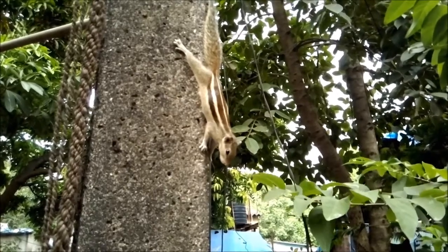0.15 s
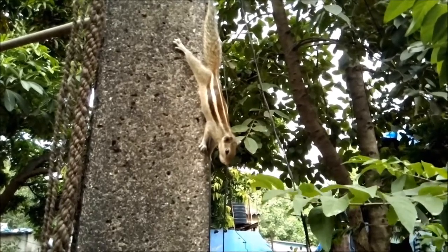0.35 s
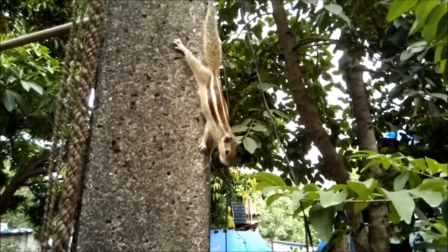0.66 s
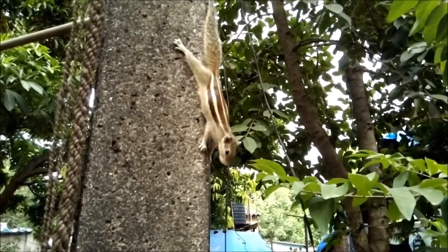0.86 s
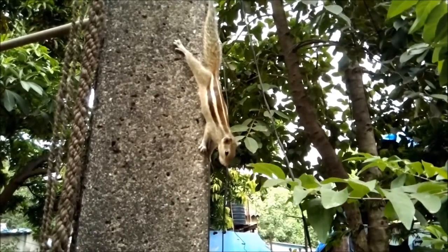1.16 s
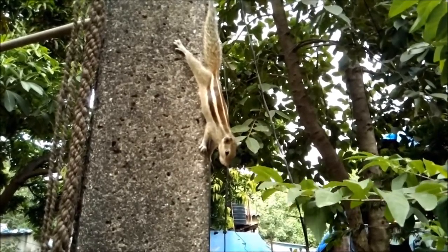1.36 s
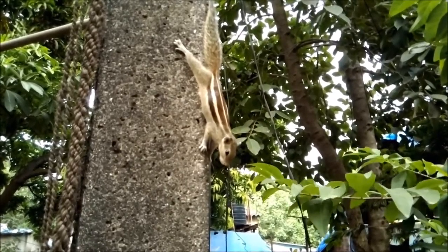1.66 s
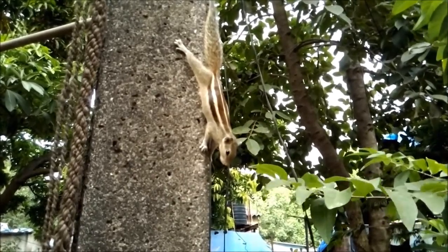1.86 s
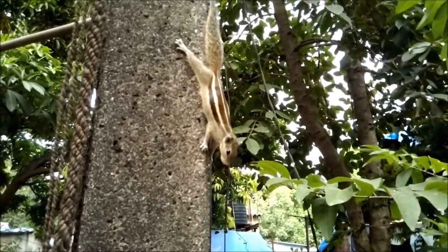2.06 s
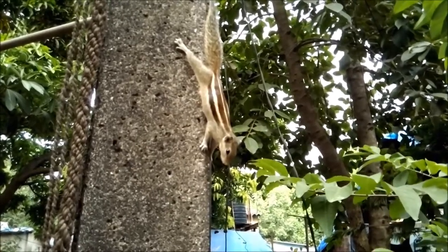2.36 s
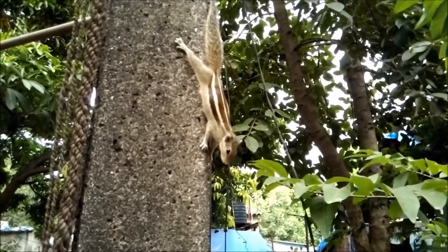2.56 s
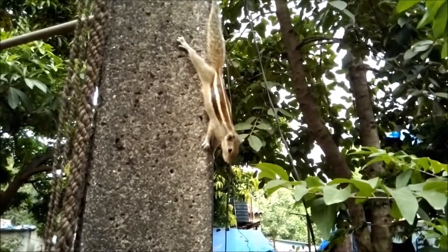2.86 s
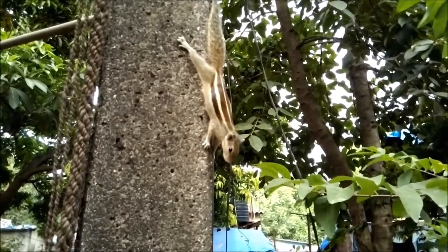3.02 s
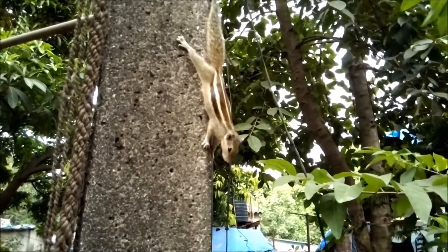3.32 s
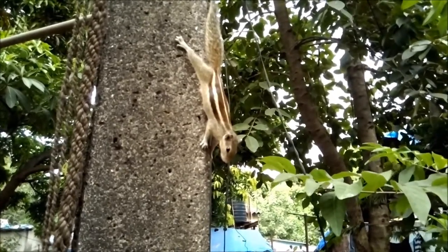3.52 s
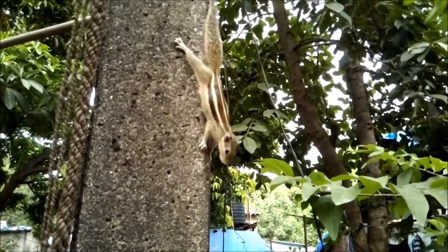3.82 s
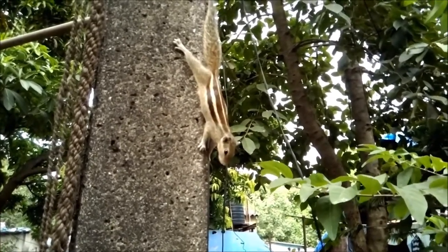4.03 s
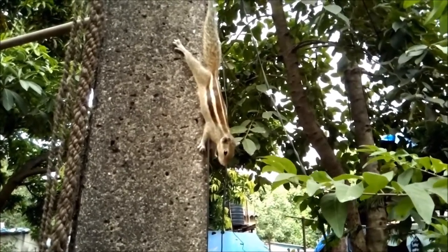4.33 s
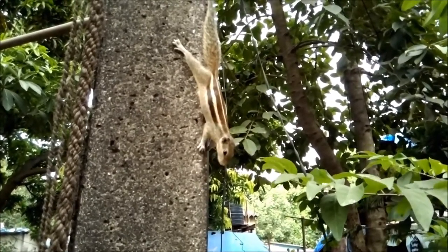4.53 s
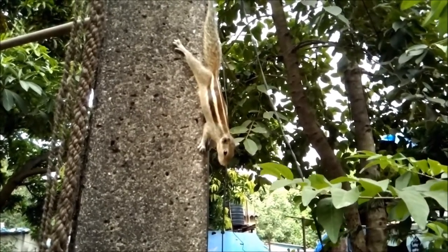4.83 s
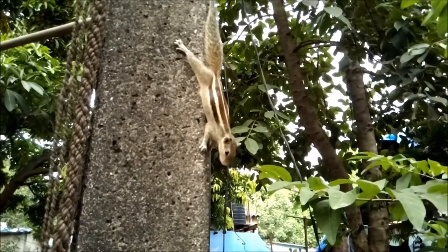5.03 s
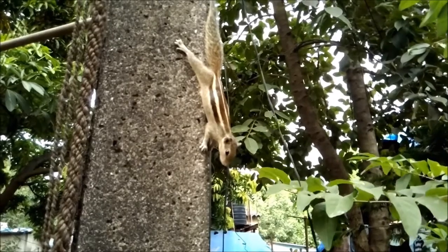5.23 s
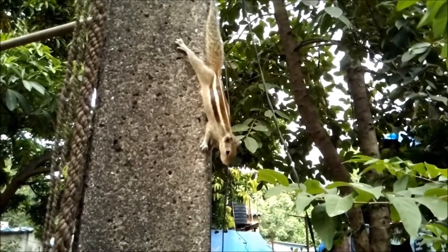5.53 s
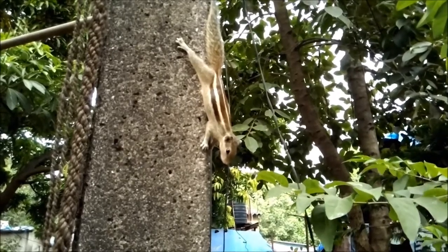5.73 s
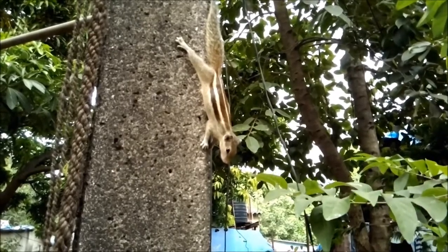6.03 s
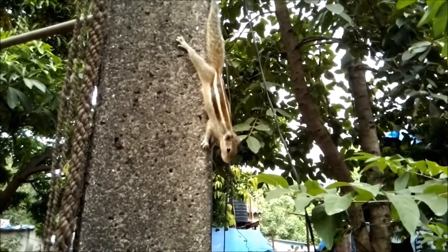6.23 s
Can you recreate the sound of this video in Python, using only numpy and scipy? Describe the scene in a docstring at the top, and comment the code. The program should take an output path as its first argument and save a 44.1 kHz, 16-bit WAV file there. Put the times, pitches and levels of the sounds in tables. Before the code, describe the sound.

Piercing, slightly hoarse two-toned squirrel chirps come in irregular bursts, each under a tenth of a second and sweeping upward. After a quieter gap with faint peeps and a distant bird-like whistle, a rapid run of short downward notes rattles out, then isolated chirps to the end. The calls splash into a bright ringing echo among trunks. Soft outdoor hiss continues throughout, with a few faint dry ticks, heard through a single microphone.

```python
"""Squirrel calling among trunks

A squirrel clings to a trunk and calls: rising chirps and one falling trill, each note two gliding sines. Single
swept sines lie between and over the calls, some faint and far; a few, set together, form further chirps and a
trill note; band noise breathes under the chirps. Trunks and walls scatter every call into a ringing tail, made
by convolution with decaying noise. Below lie a few twig ticks, an outdoor hiss of shaped noise and a faint high
tone of narrow-band noise. One microphone hears it all."""
import sys
import numpy as np
from scipy import signal
from scipy.fft import rfft, irfft, next_fast_len
from scipy.io import wavfile

SR = 44100
rng = np.random.default_rng(int(sys.argv[2]) if len(sys.argv) > 2 else 0)


def waveform_to_disk(signal):
    """Save audio, clipped to [-1, 1], as 16-bit WAV at the path in sys.argv[1]."""
    frames = np.transpose(np.atleast_2d(signal))
    scaled = np.clip(frames, -1, 1) * 32767
    samples = np.round(scaled).astype(np.int16)
    wavfile.write(sys.argv[1], SR, samples)


N = 281358   # samples

# In the call tables, level is set before the swell, waver and glide losses;
# echo send is relative to the direct sound, ahead of the gain of the scattering.
# Rising two-tone chirps: start t/s, length t/s, start f/Hz, top f/Hz, bend, level/dB,
# upper tone above the lower f/Hz, echo send level/dB
CHIRPS = [ (0.343, 0.0806, 6397, 9050, 3.11, -36.5, 1193, -12),
          (0.535, 0.0473, 5933, 7956, 2.42, -30.5, 2312, -7.5),
          (0.597, 0.0754, 6886, 9486, 1.62, -31, 1578, -14),
          (0.834, 0.04, 5900, 7852, 3, -22.5, 2229, -12.5),
          (0.977, 0.048, 6846, 8320, 1.633, -23, 1966, -10),
          (1.075, 0.088, 7803, 9300, 1.135, -30, 2000, -13.5),
          (1.742, 0.0331, 7030, 8054, 1.46, -43, 1302, -19.5),
          (2.124, 0.044, 6366, 8230, 2.35, -34.5, 2088, -11.5),
          (2.151, 0.045, 7895, 8850, 1.86, -42.5, 1960, -6.5),
          (3.43, 0.0415, 6600, 8553, 2.78, -37, 2156, -8.5),
          (3.458, 0.051, 8145, 9173, 1.206, -37.5, 1838, -6),
          (4.249, 0.0567, 7696, 8956, 2.61, -34, 1854, -7),
          (4.461, 0.0566, 5577, 8027, 2.66, -31, 2382, -11.5),
          (5.334, 0.0627, 7090, 9574, 0.936, -38.5, 2047, -8),
          (5.531, 0.0425, 5652, 7978, 2.4, -28, 2436, -8),
          (5.752, 0.0978, 6182, 9165, 1.54, -25, 1616, -16)]
# Falling two-tone notes, first scattered, then a run: start t/s, length t/s, start f/Hz, fall f/Hz,
# level/dB, upper tone above the lower at the start f/Hz, echo send level/dB
TRILL_NOTES = [ (2.977, 0.0157, 3300, 200, -51.5, 1500, -14.5),
               (3.127, 0.0167, 4928, 700, -40.5, 1180, -14.5), (3.235, 0.0168, 4370, 250, -49.5, 1706, -11),
               (3.356, 0.0172, 5590, 800, -50, 1420, -14), (3.565, 0.0124, 7562, 400, -29, 2010, -15),
               (3.608, 0.0201, 5112, 300, -44.5, 1469, -13.5),
               (3.635, 0.0249, 8210, 1100, -21, 1778, -18.5),
               (3.706, 0.0283, 8193, 1138, -20.5, 1768, -17.5),
               (3.773, 0.0327, 8142, 1486, -24.5, 1787, -14), (3.841, 0.0245, 7501, 1294, -27, 1851, -12),
               (3.908, 0.025, 7530, 1183, -24.5, 1843, -10),
               (3.969, 0.0258, 7222, 1117, -26.5, 1846, -14.5),
               (4.032, 0.022, 7143, 1315, -25, 1803, -13.5), (4.087, .026, 6512, 1200, -29, 1265, -11),
               (4.199, 0.0253, 3636, 60, -39, 3593, -10)]
# Single swept tones, faint to loud, some set together as parts of chirps and a trill note: start t/s, length
# t/s, start f/Hz, end f/Hz, bend (+ early, - late), # level/dB, echo send level/dB
WHISTLES = [ (0.0, 0.0105, 8250, 9110, -1.5, -47.5, -12), (0.346, 0.0327, 9200, 10840, 1.45, -50, -9),
            (0.36, 0.0597, 7400, 8316, 5.5, -42.5, -12), (0.867, 0.0115, 7650, 6430, -1.5, -28, -6),
            (1.087, 0.0144, 3710, 6575, 1, -34, -8), (1.223, 0.0498, 5500, 4760, 2, -57.5, -7),
            (1.601, 0.0316, 6025, 7153, 0.62, -33, -16), (1.597, 0.0301, 7170, 8255, 0.3, -38, -13.5),
            (1.605, 0.0197, 8740, 9140, 5.5, -50, -16.5), (1.62, 0.0299, 7980, 9060, 1.35, -41, -17.5),
            (1.636, 0.0267, 7310, 7570, 3, -42, -16), (1.896, 0.0364, 5210, 5730, 5, -51.5, -17),
            (1.899, 0.027, 7120, 7250, 0.5, -48, -15), (2.26, 0.039, 5074, 5677, 4, -43, -13.5),
            (2.604, 0.0312, 10060, 7800, -0.55, -55, -5), (2.669, 0.0126, 5720, 7600, -0.43, -44.5, -11),
            (3.128, 0.0147, 10950, 6930, -0.75, -44, -5), (3.586, 0.013, 5740, 7530, -0.46, -44, -5),
            (3.797, 0.0278, 10130, 9930, -0.82, -30.5, -12), (3.91, 0.0577, 10060, 9921, 9, -27, -22),
            (4.022, 0.0364, 10830, 10420, -1.5, -32.5, -16), (4.137, 0.029, 6750, 6923, 2.06, -24.5, -15.5),
            (4.138, 0.027, 5687, 4670, -1.26, -29.5, -15.5), (4.297, 0.044, 9320, 9650, -0.5, -53, -7),
            (4.881, 0.0293, 8610, 7250, 2, -39, -13), (4.882, 0.0148, 9870, 8100, -0.65, -42.5, -14),
            (5.906, 0.0356, 7560, 8560, 2.5, -38, -14)]
# Short single falling tones, faint to loud: start t/s, start f/Hz, level/dB, echo send level/dB
PIPS = [ (0.0, 7570, -44, -7.5), (0.151, 4677, -62.5, -6), (0.209, 7497, -49, 1), (0.266, 5954, -58, 1.5),
        (0.493, 7573, -56.5, 8.5), (0.802, 7324, -46, -2.5), (1.392, 7384, -50.5, -1),
        (1.518, 6966, -62, 9.5), (1.098, 6682, -36, -14.5), (1.736, 7266, -47.5, -3.5),
        (2.261, 7526, -34.5, -11.5), (2.643, 7593, -48, -7), (2.703, 3544, -52, -15),
        (3.161, 3460, -54.5, -0.5), (3.612, 10370, -45, -12), (3.966, 10750, -40.5, -20.5),
        (4.04, 9190, -24.5, -24), (4.122, 7906, -27, -12), (4.123, 9710, -34.5, -10.5)]
# Path of a far bird's slow whistle: t/s, f/Hz, level/dB before waver
SLOW_WHISTLE = [(2.608, 5042, -61), (2.645, 5538, -58.5), (2.75, 5870, -54), (2.801, 6070, -54),
                (2.84, 6450, -56.5), (2.93, 6550, -66)]
# Decay of the scattered sound over pitch: f/Hz, time to fall by 60 dB t/s
ECHO_DECAY = [(3600, 0.14), (5000, 0.723), (6000, 0.617), (8000, 0.4396), (11000, 0.511)]
# Strength of the scattering over pitch, low notes scatter less: f/Hz, relative level/dB
ECHO_COLOUR = [(3600, -4), (5000, -2), (7000, -1.5), (11000, -2)]
# Twig ticks: t/s, ring level/dB, ring f/Hz
TWIG_TICKS = [(2.133, -37.5, 1234), (4.903, -33.5, 986), (5.747, -40.5, 1570), (5.784, -39, 1527),
              (5.957, -40, 1506), (6.224, -40.5, 2495), (6.255, -39, 1186)]
# Shape of the hiss spectrum: f/Hz, relative level/dB per Hz
HISS_SHAPE = [(20, -25.5), (195, -2), (398, 2), (1540, -2.5), (3310, -8.5), (5480, -8.5), (6770, -6.5),
              (7730, -14.5), (10300, -13.5), (11200, -22.5), (14600, -50.5)]

FALL_BEND, UPPER_FALL_SHARE = -3.5, 1.258   # a note holds, then drops; the upper tone drops by this share
UPPER_LEAD_S = 0.0018   # the upper tone starts this much earlier
# The upper tone weakens as it nears the top of its range
UPPER_DB, THIN_FROM_HZ, THIN_DB_PER_KHZ, THINNEST_DB = -0.5, 8955, 8.5, -13
PIP_S, PIP_DROP_HZ, PIP_BEND = 0.02025, 264, -1.95
SLOW_ECHO_DB = 3
SWELL_SKEW, SWELL_POWER = -0.038, 0.277
GROW_DB = 14   # an early glide starts this much softer than its held pitch
LOSS_DB_PER_KHZ_PER_MS = 20.5   # a tone is weaker while its pitch moves fast
WAVER_DB, HOARSE_HZ = 2.4, 70   # spread of the quick level waver and pitch tremble
# Air hissing through the throat, its level relative to the chirp
AIR_DB, AIR_LOW_HZ, AIR_HIGH_HZ, AIR_LINGERS_S = -27.5, 4000, 7930, 0.0603
TICK_T60_S, SNAP_T60_S = 0.01146, 0.0118
SNAP_DB, SNAP_SPREAD = -3, 3.25   # noise level against the ring before its decay; reach above and below, factor
HISS_DB, HISS_FLUTTER_DB = -54.5, 1.995
DRONE_HZ, DRONE_WIDTH_HZ, DRONE_DB, DRONE_SWELL_DB = 7785, 195, -72, 7.5
CUTOFF_HZ = 11100


def from_db(db):
    """Gain of a level in dB."""
    return 10 ** (np.asarray(db) / 20)


def rms_one(x):
    """Scaled to rms 1."""
    return x / np.sqrt(np.mean(x ** 2) + 1e-20)


def at_hz(points, hz):
    """Reads a curve on a log-frequency axis."""
    curve_hz, value = np.transpose(points)
    return np.interp(np.log(hz), np.log(curve_hz), value)


def drift(rate_hz, count):
    """Smoothed chance, rms 1: noise through two equal poles, slower for a lower rate."""
    r = np.exp(-2 * np.pi * rate_hz / SR)
    settled = signal.lfilter([1], [1, -2 * r, r * r], rng.standard_normal(count + SR))[SR:]
    return rms_one(settled)


def band_noise(noise, order, low_hz, high_hz):
    """Noise passed through a Butterworth band."""
    band = signal.butter(order, [low_hz, high_hz], "band", fs=SR, output="sos")
    return signal.sosfilt(band, noise)


def glide_share(u, bend):
    """Travel from start to end pitch: positive bend ramps, then holds; negative holds, then ramps."""
    if bend > 0:
        return np.tanh(bend * u) / np.tanh(bend)
    return 1 - np.tanh(bend * (1 - u)) / np.tanh(bend)


def add_tone(buses, s, length, start_hz, end_hz, bend, level_db, echo_db, waver, tremble_hz, thins=False):
    """One gliding sine, swelling and fading, sent to the direct and the echo bus."""
    at = max(round(s * SR), 0)
    u = np.linspace(0, 1, round(length * SR))
    span = slice(at, at + len(u))
    share = glide_share(u, bend)
    glide_hz = start_hz + (end_hz - start_hz) * share
    khz_per_ms = np.abs(np.gradient(glide_hz)) * SR / 1e6
    swell = np.abs(np.sin(np.pi * u ** np.exp(SWELL_SKEW * bend))) ** SWELL_POWER
    growth_db = -GROW_DB * (bend > 0) * (1 - share) ** 2
    tone_db = level_db + growth_db - LOSS_DB_PER_KHZ_PER_MS * khz_per_ms + waver[span]
    if thins:
        over_khz = (glide_hz - THIN_FROM_HZ) / 1000
        tone_db = tone_db + np.clip(UPPER_DB - THIN_DB_PER_KHZ * over_khz, THINNEST_DB, UPPER_DB)
    phase = 2 * np.pi * np.cumsum(glide_hz + tremble_hz[span]) / SR
    tone = swell * from_db(tone_db) * np.sin(phase)
    buses[:, span] += tone * from_db([[0], [echo_db]])


def add_two_tone(buses, s, length, lower_hz, upper_hz, bend, level_db, echo_db, wavers):
    """Two sines gliding together, each from its first to its second pitch; the upper leads and thins."""
    lower, upper, tremble_hz = wavers
    add_tone(buses, s, length, *lower_hz, bend, level_db, echo_db, lower, tremble_hz)
    add_tone(buses, s - UPPER_LEAD_S, length, *upper_hz, bend, level_db, echo_db, upper, tremble_hz, thins=True)


def chirps(buses, wavers):
    """The squirrel's rising chirps: both tones climb by the same interval in Hz, then hold."""
    for s, length, start_hz, top_hz, bend, level_db, above_hz, echo_db in CHIRPS:
        upper_hz = (start_hz + above_hz, top_hz + above_hz)
        add_two_tone(buses, s, length, (start_hz, top_hz), upper_hz, bend, level_db, echo_db, wavers)


def trill(buses, wavers):
    """The squirrel's falling notes: both tones hold, then drop, the upper one further."""
    for s, length, hz, fall_hz, level_db, above_hz, echo_db in TRILL_NOTES:
        lower_hz = (hz, hz - fall_hz)
        upper_hz = (hz + above_hz, hz + above_hz - fall_hz * UPPER_FALL_SHARE)
        add_two_tone(buses, s, length, lower_hz, upper_hz, FALL_BEND, level_db, echo_db, wavers)


def air():
    """A puff of band noise under each rising chirp, scaled to its level, dying away after it."""
    t, level = np.arange(N) / SR, np.zeros(N)
    for s, length, _, _, _, chirp_db, _, _ in CHIRPS:
        rise = np.clip((t - s) / length * 2, 0, 1)   # full by mid-chirp
        fade = np.exp(-np.maximum(t - s - length, 0) / AIR_LINGERS_S)
        level += from_db(chirp_db + AIR_DB) * rise * fade
    return level * rms_one(band_noise(rng.standard_normal(N), 2, AIR_LOW_HZ, AIR_HIGH_HZ))


def whistles(buses, wavers):
    """Single sines between and over the calls, a few forming parts of chirps and a trill note: short falling
    pips and freely swept tones."""
    _, upper, tremble_hz = wavers
    for s, hz, level_db, echo_db in PIPS:
        add_tone(buses, s, PIP_S, hz, hz - PIP_DROP_HZ, PIP_BEND, level_db, echo_db, upper, tremble_hz)
    for row in WHISTLES:
        add_tone(buses, *row, upper, tremble_hz)


def slow_whistle(buses, wavers):
    """A far bird: one sine following a drawn path of pitch and level."""
    lower, _, tremble_hz = wavers
    s, hz, db = np.transpose(SLOW_WHISTLE)
    t = np.arange(N) / SR
    sounding = (t > s[0]) * (t < s[-1])
    phase = 2 * np.pi * np.cumsum(np.interp(t, s, hz) + tremble_hz) / SR
    tone = from_db(np.interp(t, s, db) + lower) * sounding * np.sin(phase)
    buses += tone * from_db([[0], [SLOW_ECHO_DB]])


def calls():
    """All calls and whistles as (direct, echo send); level and pitch waver quickly."""
    buses = np.zeros((2, N))
    lower, upper = WAVER_DB * drift(180, N), WAVER_DB * drift(150, N)
    wavers = lower, upper, HOARSE_HZ * drift(742, N)
    for source in (chirps, trill, whistles, slow_whistle):
        source(buses, wavers)
    return buses


def grove(send):
    """Dense scattering: noise that dies band by band, strong near echoes, a weak far tail."""
    t, response = np.arange(SR) / SR, np.zeros(SR)
    edges_hz = np.geomspace(2800, 12500, 9)
    for low, high in zip(edges_hz, edges_hz[1:]):
        centre_hz = np.sqrt(low * high)
        near = from_db(-60 * t / at_hz(ECHO_DECAY, centre_hz))
        far = from_db(-23.0 - 25 * t)
        band = band_noise(rng.standard_normal(SR), 2, low, high)
        response += band * from_db(at_hz(ECHO_COLOUR, centre_hz)) * (near + far)
    response *= -np.expm1(-t / 0.002)   # first reflections take a moment
    response *= 2.17 / np.sqrt(np.sum(response ** 2))
    return signal.fftconvolve(send, response)[:N]


def ticks():
    """Short dull rings of dry wood, decaying sines, each with a broad snap of noise."""
    out, t = np.zeros(N), np.arange(SR // 50) / SR
    for s, level_db, hz in TWIG_TICKS:
        at = round(s * SR)
        ring = from_db(level_db - 60 * t / TICK_T60_S) * np.sin(2 * np.pi * hz * t)
        noise = band_noise(rng.standard_normal(len(t)), 1, hz / SNAP_SPREAD, hz * SNAP_SPREAD)
        snap = from_db(level_db + SNAP_DB - 60 * t / SNAP_T60_S) * noise
        out[at:at + len(t)] += ring + snap
    return out


def hiss():
    """Far traffic, leaves and microphone noise; two unrelated halves of the spectrum flutter a little."""
    size = next_fast_len(N)
    hz = np.maximum(np.arange(size // 2 + 1) * SR / size, 1)
    turn = np.pi * np.log2(hz)
    # Interleaved half-octave bands
    white = rfft(rng.standard_normal((2, size))) * [np.cos(turn), np.sin(turn)]
    halves = irfft(white * from_db(at_hz(HISS_SHAPE, hz)), size)[:, :N]
    flutter_db = HISS_FLUTTER_DB * np.array([drift(22.2, N), drift(22.4, N)])
    return from_db(HISS_DB) * rms_one(np.sum(halves * from_db(flutter_db), axis=0))


def drone():
    """A faint high tone, perhaps an insect: a narrow band of noise that swells and sinks slowly."""
    half_hz = DRONE_WIDTH_HZ / 2
    tone = rms_one(band_noise(rng.standard_normal(N), 2, DRONE_HZ - half_hz, DRONE_HZ + half_hz))
    return from_db(DRONE_DB + DRONE_SWELL_DB * drift(2.33, N)) * tone


def scene():
    """One microphone feeds both channels."""
    direct, send = calls()
    mono = direct + air() + grove(send) + ticks() + hiss() + drone()
    return np.array([mono, mono])


def record(dry):
    """A steep elliptic low-pass cuts the top."""
    return signal.sosfilt(signal.ellip(12, .5, 62, CUTOFF_HZ, fs=SR, output="sos"), dry)


dry = scene()
out = record(dry)
waveform_to_disk(out)
```